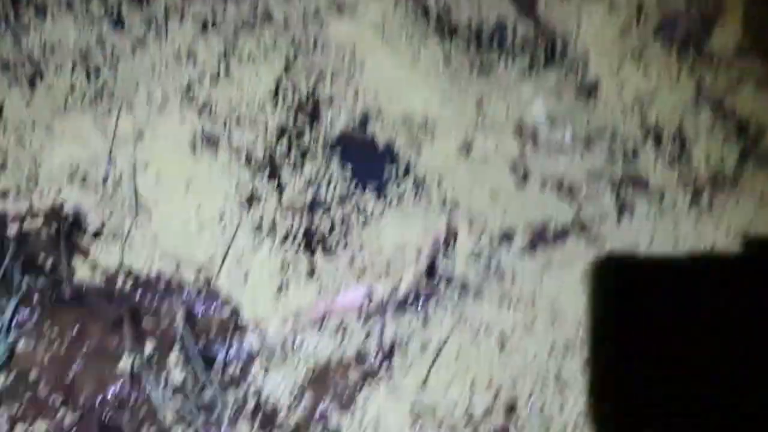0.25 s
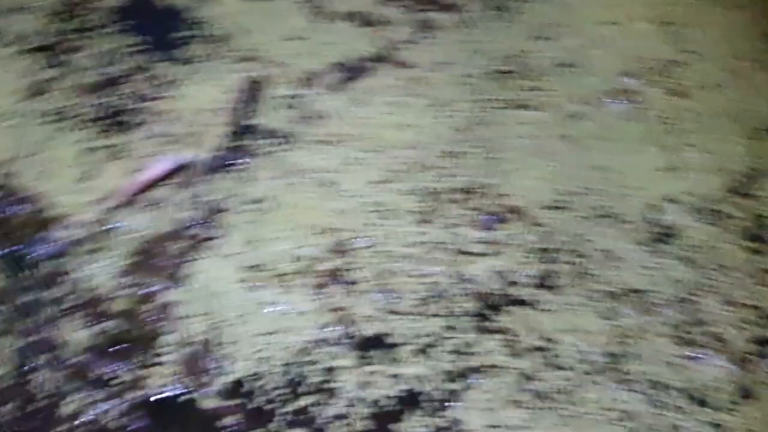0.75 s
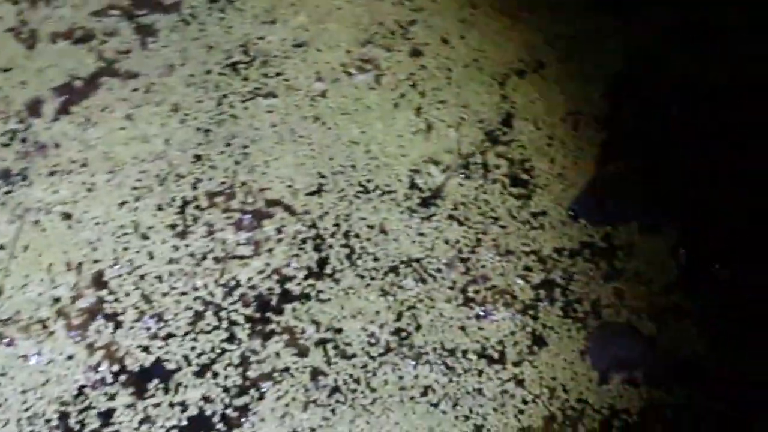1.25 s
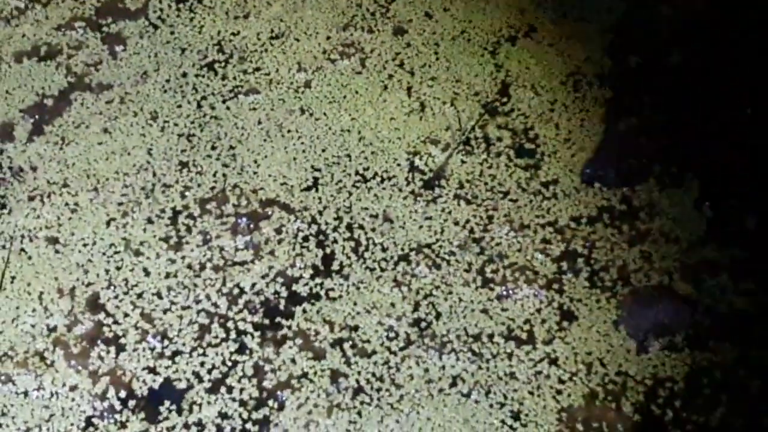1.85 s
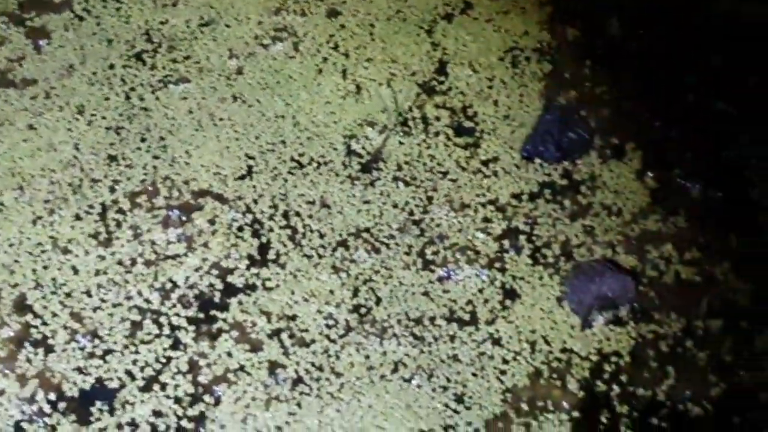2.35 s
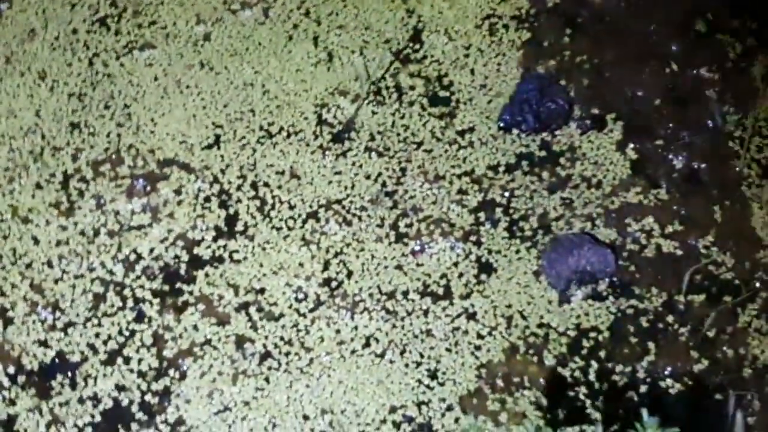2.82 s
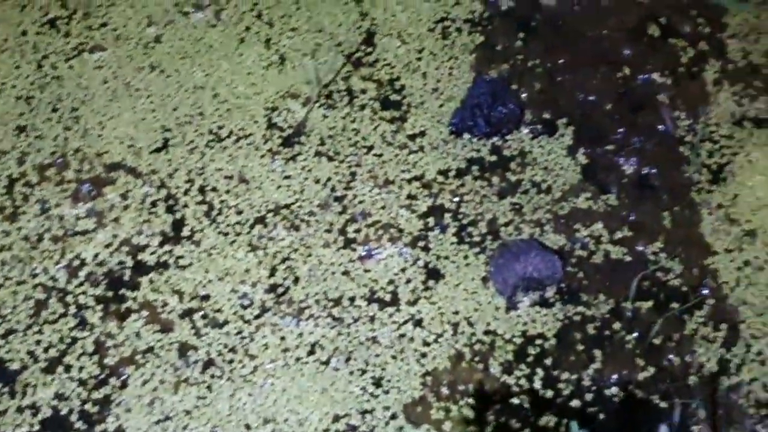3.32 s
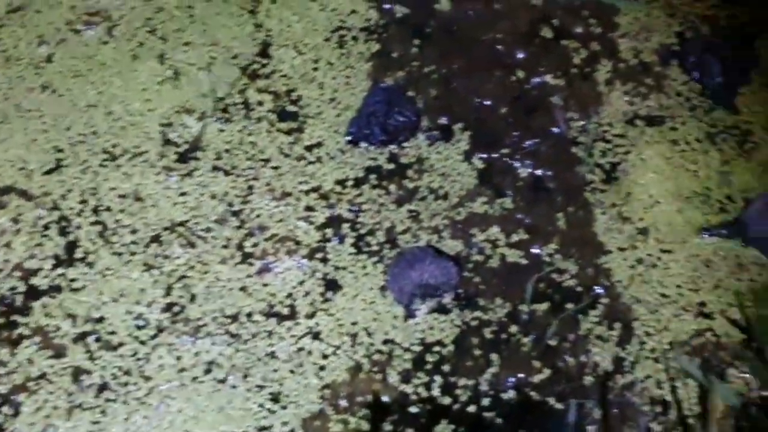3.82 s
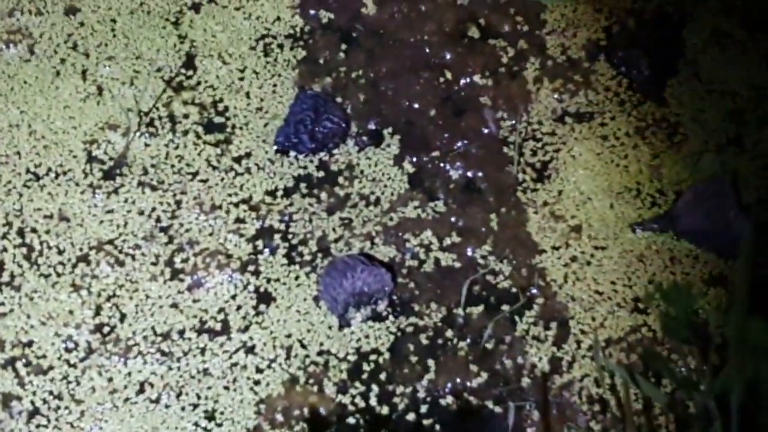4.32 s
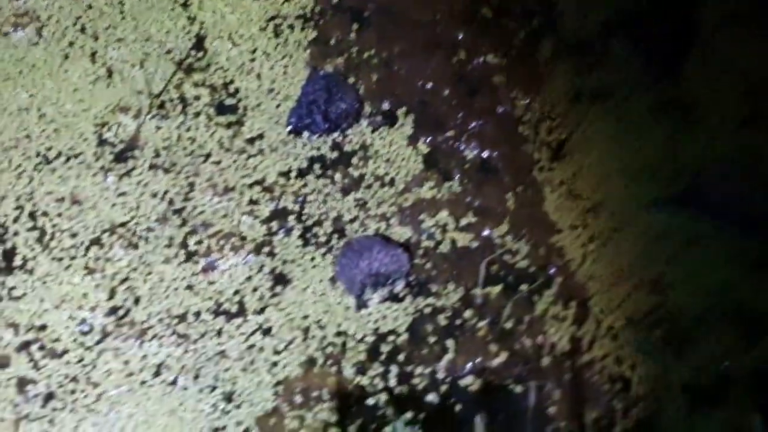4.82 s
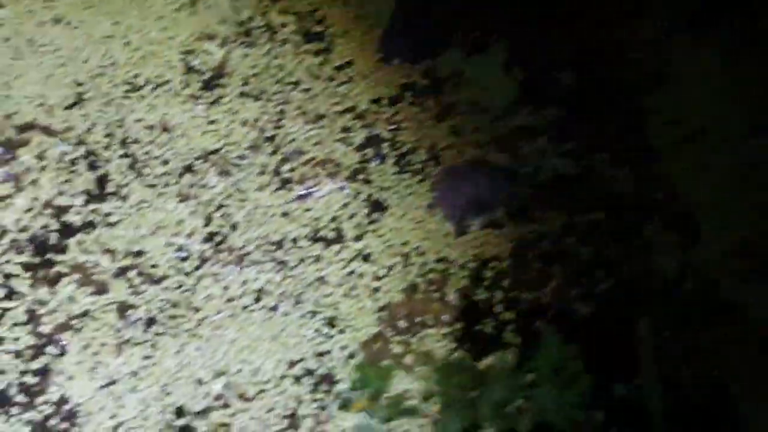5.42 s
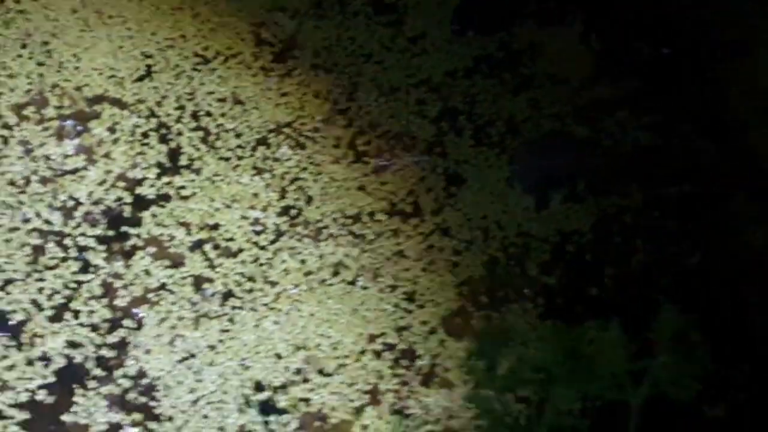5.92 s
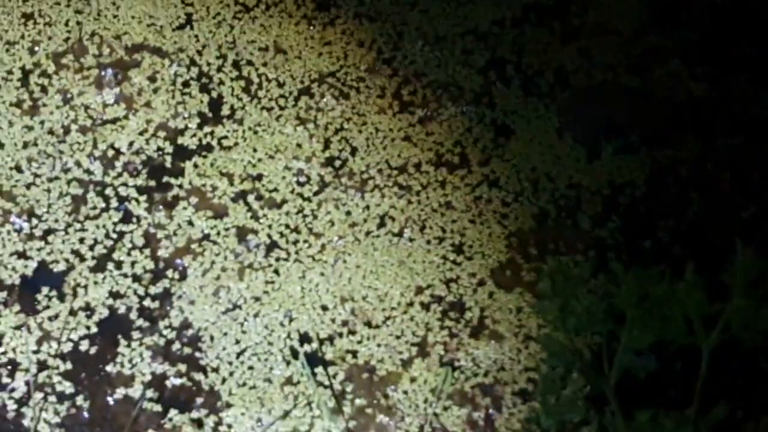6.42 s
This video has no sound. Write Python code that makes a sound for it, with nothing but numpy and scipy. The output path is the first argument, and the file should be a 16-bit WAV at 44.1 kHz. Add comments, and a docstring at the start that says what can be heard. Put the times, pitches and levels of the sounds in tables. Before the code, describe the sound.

A night pond full of tree frogs, heard through slowly turning hand-held stereo microphones. From 0 s a bright, thin rustle on the left drops away within about half a second, leaving a faint trail until 1.6 s, with tiny dry snaps near 0.1, 0.8 and 1.1 s. A close frog, slightly left, croaks at 0.1, 0.4 and 0.7 s: bursts under a tenth of a second, each a quickening ratchet of about fourteen pulses, ringing around 2.6 kHz and rising in pitch. It rests, croaks at 2.4 s, then resumes from 3.2 s, every 0.3 to 0.5 seconds, until 6.4 s. Throughout, quieter neighbours on the left croak about three times a second each, interlocking and overlapping, above a blurred, throbbing far chorus. Short dull echoes soften the calls. A very faint low engine hum and still night air remain underneath.

```python
"""Frogs at a weedy pond by night

One tree frog croaks close by, on the left, over a far chorus and neighbours on the left: two croak in a fairly
steady beat, the other croaks are irregular and sometimes overlap. Each croak is a quickening train of throat
pulses ringing the vocal sac, rising in pitch as the sac fills. A far engine hums below; a rustle of bright noise
dies away at the start and a few dry stems snap.
Hand-held microphones turn slowly, which shifts the near frog's level, colour, lag and balance."""
import sys
import numpy as np
from scipy import signal
from scipy.fft import rfft, irfft
from scipy.io import wavfile
from scipy.ndimage import uniform_filter1d

SR = 44100
rng = np.random.default_rng(int(sys.argv[2]) if len(sys.argv) > 2 else 0)


def how_loud(loudness_db):
    """Turn decibels into a plain amplitude multiplier (0 dB gives 1, 20 dB gives 10)."""
    steps = np.asarray(loudness_db, float) / 20
    return 10 ** steps


def waveform_to_disk(signal):
    """Save audio, clipped to [-1, 1], as 16-bit WAV at the path in sys.argv[1]."""
    frames = np.transpose(np.atleast_2d(signal))
    scaled = np.clip(frames, -1, 1) * 32767
    samples = np.round(scaled).astype(np.int16)
    wavfile.write(sys.argv[1], SR, samples)


N = 293706

# Still air and far traffic. Each row: frequency in Hz, relative density in dB per Hz.
NIGHT_COLOUR = [(25, -51), (45, -14.5), (62, -0.5), (85, -6), (130, -13.5), (250, -22.5), (380, -26),
                (520, -22), (800, -36.5), (3000, -37), (6000, -46.5), (10000, -41), (16000, -75.5)]
# Left-right likeness of noise. Each row: frequency in Hz, correlation from 0 to 1.
LIKENESS = [(60, 0.93), (130, 0.98), (290, 0.5), (640, .1), (16000, .02)]
# Engine tones. Each row: frequency in Hz, width in Hz, level in dB.
HUM_TONES = [(76, 7, -58.5), (286, 5, -81)]
# Rustle spectrum. Each row: frequency in Hz, relative density in dB per Hz.
RUSTLE_COLOUR = [(1500, -4), (4000, 4.5), (7000, -9.5), (11000, -5.5), (16000, -8)]
# Far chorus loudness. Each row: time in seconds, level in dB.
FAR_LEVEL = [(0.0, -29), (0.37, -29), (1.0, -34.5), (2.41, -31), (2.49, -33), (3.49, -31), (3.58, -33.5),
             (4.4, -33), (4.49, -34), (5.36, -32.5), (6.21, -35), (6.66, -29.5)]
# Neighbours. Each row: pitch in Hz, left over right in dB, left lag in us, low ring gain in dB,
# croak length in ms, croaks as (start in seconds, level in dB).
NEIGHBOURS = [(2366, 6.4, -420, -7, 84, [(.064, -27.5), (.374, -31), (.669, -22.5), (.974, -23.5),
              (1.312, -24), (1.63, -20), (1.924, -22), (2.202, -21), (2.495, -23), (2.838, -21.5),
              (3.19, -22), (3.498, -21), (3.776, -20.5), (4.102, -23.5), (4.386, -21.5), (4.671, -22),
              (4.964, -19.5), (5.268, -22), (5.575, -20), (5.875, -20.5), (6.174, -21.5), (6.59, -22.5)]),
              (2662, 8, -430, 0, 82, [(.235, -24.5), (.535, -22), (.843, -18.5), (1.245, -17.5),
              (1.575, -17), (1.865, -18), (2.157, -16), (2.485, -20.5), (2.708, -17), (3.002, -16.5),
              (3.32, -17.5), (3.666, -19), (3.95, -22), (4.24, -20), (4.527, -18), (4.835, -22),
              (5.13, -25), (5.44, -18), (5.728, -19), (6.03, -23.5), (6.327, -19), (6.6, -20.5)]),
              (2663, 6.8, -100, -5, 82, [(.315, -31), (.61, -24.5), (1.005, -19), (1.14, -20), (1.49, -19),
              (1.794, -23), (2.06, -19), (2.32, -23.5), (2.645, -23.5), (2.792, -18), (3.09, -25),
              (3.4, -28), (3.829, -21), (4.123, -20), (4.58, -37), (4.952, -24.5), (5.275, -34),
              (5.36, -27), (5.5, -39), (5.83, -25), (5.89, -20), (6.175, -21.5), (6.53, -27)])]
# Near croaks. Each row: start in seconds, length in ms, number of pulses, rasp gain in dB,
# climb of the treble rings as a share of their pitch.
NEAR_CROAKS = [(.1223, 90.7, 14, 1, .05), (.4111, 94.6, 14, 3, .05), (.7069, 90.1, 14, -5, .05),
               (2.385, 85.5, 16, 5, .38), (3.2305, 79.9, 14, -3, .36), (3.5463, 82.6, 14, 0, .2),
               (3.9401, 86.5, 14, 2, .1), (4.3511, 86.2, 14, -2, .1), (4.7325, 87.1, 14, -1, .1),
               (5.1305, 87.4, 14, 3, .1), (5.5831, 88.3, 14, -2, .03), (5.9693, 89.5, 14, -4, .03),
               (6.4421, 88.3, 14, -3, .05)]
# Microphone aim at the near frog. Each row: time in seconds, level in dB, left lag in us,
# left over right of the main ring in dB, treble gain in dB, low ring gain in dB.
AIM = [(.2, -9, 63, 2, -2.5, -2.5), (.75, -9, 33.5, 3.5, 4.5, -2), (2.399, -10, -37.5, 6, 5, 2),
       (3.25, -9, -37, 6, 6, 0.5), (3.95, -9, -97.5, 2, 2, .5), (4.75, -8.5, -105, 3.5, 2, 0),
       (5.151, -8.5, -65, 4.5, 1, -0.5), (5.6, -9, -11, 5.5, 2.5, 1), (6.45, -7.5, 27, 3, 4, 0)]
# Near sac and throat modes. Each row: frequency in Hz, level in dB, half the gain over a croak in dB.
NEAR_MODES = [(724, -47, 7), (1186, -10, -1.3), (1517, -12, 4.5), (2070, -13, -2), (2581, -4, -1.2),
              (2887, -12, 4.5), (3454, -22, -0.5), (4028, -21.5, 4), (4880, -31.5, -5.5),
              (6700, -47.5, -13.5), (8630, -37, -3), (9320, -35, 1), (11100, -48.5, 1),
              (14000, -68.5, 13.5)]
# Their pulse shapes. Each row: rise in dB per ms, fall in dB per ms, knee in ms before the slap,
# roughness in Hz (sign ignored).
NEAR_SHAPES = [(1, 3.5, .5, -0.5), (7, 5, 0.17, 0), (10, 13, 0.53, -1.5), (9.5, 9, .8, 1),
               (17.5, 3, 0.2, 2), (11.5, 7.5, 0, 1), (6, 11, 0, 21), (12.5, 15, 0.066, 23.5),
               (15.5, 12, 0, 700), (16.5, 5, 0.13, 800.5), (20, 8, 0.12, 504.5), (18.5, 7.5, .2, 301),
               (11.5, 10, .2, 395), (12.5, 10.5, .2, 1000)]
# Modes of the smaller frogs, scaled by pitch over MODE_PITCH_HZ. Each row: frequency in Hz, level in dB,
# half the gain over a croak in dB.
CHORUS_MODES = [(757, -46, 9.5), (1121.6, -16.5, -4.5), (1385, -14.5, -8), (1732, -15, -2.1),
                (2313, -14, 1.5), (2641, -4.5, -3), (3055, -13.5, -5), (3864, -24.5, -6),
                (5200, -54.5, -2.3), (7110, -41, -2.8), (8850, -53, -1.5)]
# Their pulse shapes. Each row: rise in dB per ms, fall in dB per ms, knee in ms before the slap, roughness in Hz.
CHORUS_SHAPES = [(4, 2.3, .5, 0), (7, 3, 0.66, 4.5), (7, 4.6, 0.13, 6), (8, 16, 0.32, 32.5),
                 (8, 6, 0.42, 7), (9, 3.62, 0.11, 7.5), (9, 7, 0.23, 62), (10, 5.6, 0, 202.5),
                 (16, 11, 0, 1002.5), (16, 4.9, 0, 1204), (16, 2.9, 0.13, 1000.5)]
# Snaps of dry stems. Each row: start in seconds, noise level at the start in dB, before filter and panning.
SNAPS = [(0.125, -40.5), (0.8355, -52), (1.098, -55)]

NIGHT_DB = -57
# The rustle starts loud, drops quickly, then trails off until it stops; levels before panning.
RUSTLE_DB, RUSTLE_HOLD_S, RUSTLE_FALL_DB_PER_S = -46.5, 0.15, 108
TRAIL_DB, TRAIL_FALL_DB_PER_S, TRAIL_END_S = -57, 9, 1.6

MODE_PITCH_HZ = 2600  # pitch at which the mode tables hold
SLAP_DELAY_MS, PHASE_ORIGIN_MS = 1.0, 1.376  # first slap after the start; ring phase origin before each slap
# Gaps between pulses shrink evenly; the first is longer (shares of the second gap).
FIRST_GAP, LAST_GAP = 1.23, .71
# Pulses start weak and gain over a few beats; the last ones drop.
START_DB, GAIN_PULSES, END_DB, DROP_PULSES = -9, 2.7, -5.5, 2.32
GLIDE = .09  # pitch rise over a croak, share
SAC_FOOT_HZ = 620  # lowest radiated pitch
LOW_TOP_HZ, TREBLE_FOOT_HZ, RASP_TOP_HZ, CLIMB_TOP_HZ = 1800, 4600, 7400, 10000

# The housing shades the microphones: low ring and treble take a share of the lag and their own balance.
NEAR_LOW_LAG, NEAR_TREBLE_LAG, TREBLE_LAG_US = .7, .8, 5
CHORUS_LOW_LAG, CHORUS_LOW_PAN_DB, CHORUS_TREBLE_PAN_DB = 0.76, -1.5, 5.5
FAR_LAG_US, FAR_LAG_SPREAD_US = -400, 150  # well to the left

NEAR_ECHO_DB, CHORUS_ECHO_DB = -18, -11
BANK_T60_S, BANK_CUT_HZ = .45, 7000
SLAP_BACK_MS, SLAP_BACK_DB, SLAP_BACK_CUT_HZ = 7, -13.5, 2970
TOP_CUT_HZ = 15750


def rms_one(x):
    """Scaled to unit power."""
    return x / np.sqrt(np.mean(x ** 2) + 1e-20)


def in_time(rows):
    """A curve at every sample."""
    return np.interp(np.arange(N) / SR, *np.transpose(rows))


def at_hz(points, hz):
    """A spectrum read on a log frequency axis."""
    point_hz, value = np.transpose(points)
    return np.interp(np.log(hz), np.log(point_hz), value)


def filtered(x, order, cut_hz, kind="low"):
    """Butterworth filter."""
    return signal.sosfilt(signal.butter(order, cut_hz, kind, fs=SR, output="sos"), x)


def coloured_noise(spectrum):
    """Stereo noise of the given colour, alike in the bass; rms 1."""
    hz = np.maximum(np.fft.rfftfreq(N, 1 / SR), 1)
    mid, side = rfft(rng.standard_normal((2, N)))
    alike = np.clip(at_hz(LIKENESS, hz), -1, 1)
    pair = np.sqrt(1 + alike) * mid + np.sqrt(1 - alike) * side * np.array([[1], [-1]])
    return rms_one(irfft(pair * how_loud(at_hz(spectrum, hz)), N))


def night_floor():
    """Still air and far traffic: steady coloured noise."""
    return how_loud(NIGHT_DB) * coloured_noise(NIGHT_COLOUR)


def hum():
    """A far engine: noise through narrow resonances gives wavering tones, alike on both sides."""
    out = np.zeros(N)
    for hz, width_hz, level_db in HUM_TONES:
        r = np.exp(-np.pi * width_hz / SR)
        poles = [1, -2 * r * np.cos(2 * np.pi * hz / SR), r * r]
        tone = signal.lfilter([1, 0, -1], poles, rng.standard_normal(N + SR))
        out += how_loud(level_db) * rms_one(tone[SR:])  # the resonance has settled by then
    return out


def rustle():
    """Bright noise, mostly on the left, in a fast burst and a slower trail."""
    t = np.arange(N) / SR
    burst = how_loud(RUSTLE_DB - RUSTLE_FALL_DB_PER_S * np.maximum(t - RUSTLE_HOLD_S, 0))
    trail = how_loud(TRAIL_DB - TRAIL_FALL_DB_PER_S * t) * np.clip((TRAIL_END_S - t) / .05, 0, 1)
    return np.hypot(burst, trail) * how_loud([[4.], [-9.]]) * coloured_noise(RUSTLE_COLOUR)


def add_croak(out, modes, shapes, start_s, length_ms, pitch_hz, level_db, pan_db, lag_s,
              jitter_ms, uneven_db, climb=0, count=14):
    """In every pulse the sac modes swell to the slap of the folds, then ring out."""
    hz, mode_db, half_gain_db = np.transpose(modes)
    rise, fall, knee_ms, rough_hz = np.transpose(shapes)[..., None]
    n_modes, k = len(hz), np.arange(count)

    gaps = np.r_[0, FIRST_GAP, np.linspace(1, LAST_GAP, count - 2)]
    way = np.cumsum(gaps) / np.sum(gaps)
    to_go = 1 - way[:, None]
    fill = (way ** .7 - .6)[:, None]  # the sac tightens, fastest at first
    jitter = jitter_ms * rng.standard_normal(count)
    slaps = start_s + (SLAP_DELAY_MS + way * length_ms + jitter) / 1000

    freq = hz * pitch_hz / MODE_PITCH_HZ * (1 + GLIDE * fill)
    freq = freq * (1 - climb * (.25 + to_go ** 3))
    freq = freq * (1 + .003 * rng.standard_normal((count, n_modes)))

    pulse_db = START_DB * np.exp(-k / GAIN_PULSES) + END_DB * np.exp(-k[::-1] / DROP_PULSES)
    level = level_db + pulse_db[:, None] + mode_db + 2 * half_gain_db * fill
    level = level + uneven_db * rng.standard_normal((count, n_modes))

    # axes: pulse, mode, sample
    first, span = np.round(slaps * SR).astype(int) - 200, 700
    t = ((first[:, None] + np.arange(span)) / SR - slaps[:, None])[:, None]
    ms = 1000 * t + knee_ms
    swell = signal.windows.tukey(span, .2) * 2 / (how_loud(-rise * ms) + how_loud(fall * ms))

    # wet tissue: the phase of the upper modes wanders, which smears them toward noise
    steps = uniform_filter1d(rng.standard_normal(swell.shape), size=6, axis=2)
    wander = np.cumsum(steps, axis=2) * np.sqrt(2 * np.pi * np.abs(rough_hz) / SR)
    wander -= wander[..., 150:151].copy()  # no wander just ahead of the slap
    phase = wander + np.pi * np.arange(n_modes)[:, None]  # adjacent modes in opposite phase

    for side, sign in enumerate((.5, -.5)):
        heard_s = t + PHASE_ORIGIN_MS / 1000 - sign * lag_s
        rings = np.sin(2 * np.pi * freq[..., None] * heard_s + phase)
        wave = np.sum(how_loud(level + sign * pan_db)[..., None] * swell * rings, axis=1)
        for at, pulse in zip(first, wave):
            if 0 <= at < N:
                out[side, at:at + span] += pulse[:N - at]


def add_chorus_croak(out, start_s, length_ms, pitch_hz, level_db, low_db, pan_db, lag_us, jitter_ms, uneven_db):
    """One croak of a smaller frog, placed to the side by lag and balance."""
    hz = np.array(CHORUS_MODES)[:, 0]
    low, high = hz < LOW_TOP_HZ, hz > TREBLE_FOOT_HZ
    pans = pan_db + CHORUS_LOW_PAN_DB * low + CHORUS_TREBLE_PAN_DB * high
    lags_s = lag_us * np.where(low, CHORUS_LOW_LAG, 1)[:, None] / 1e6
    add_croak(out, CHORUS_MODES, CHORUS_SHAPES, start_s, length_ms, pitch_hz, level_db + low_db * low,
              pans, lags_s, jitter_ms, uneven_db)


def far_chorus(count=110):
    """Many frogs at evenly spread random moments blur into a throbbing band."""
    out = np.zeros((2, N))
    slot_s = N / SR / (count - 1)
    for k, (when, far, long, small, left) in enumerate(rng.random((count, 5))):
        lag_us = FAR_LAG_US + FAR_LAG_SPREAD_US * (.5 - left)
        add_chorus_croak(out, (k + when - 1) * slot_s, 75 + 18 * long, 2380 + 420 * small, -4 * far, 0,
                         2.1 + 6 * left, lag_us, jitter_ms=.2, uneven_db=1.3)
    return how_loud(in_time(FAR_LEVEL)) * rms_one(out)


def bank_echoes(x):
    """Reeds, banks and water scatter the calls: a short dull tail of noise, another on each side."""
    t = np.arange(SR // 2) / SR
    tail = rng.standard_normal((2, len(t))) * how_loud(-60 * t / BANK_T60_S) * (t > .004)
    tail = filtered(tail, 2, BANK_CUT_HZ)
    tail = tail / np.sqrt(np.sum(tail ** 2, axis=1, keepdims=True))
    return signal.fftconvolve(x, tail, axes=1)[:, :N]


def neighbours():
    """Further off and less even; each has its own low ring and lag, all on the left; two share a pitch."""
    out = np.zeros((2, N))
    for pitch_hz, pan_db, lag_us, low_db, length_ms, croaks in NEIGHBOURS:
        for start_s, level_db in croaks:
            add_chorus_croak(out, start_s, length_ms, pitch_hz, level_db, low_db, pan_db, lag_us,
                             jitter_ms=.1, uneven_db=1.5)
    return out


def near_frog():
    """As the microphones turn, the left one leads and gets more of the treble and low ring."""
    out, hz = np.zeros((2, N)), np.array(NEAR_MODES)[:, 0]
    low, high = hz < LOW_TOP_HZ, hz > TREBLE_FOOT_HZ
    rasp, climbing = high * (hz < RASP_TOP_HZ), high * (hz < CLIMB_TOP_HZ)
    aim_s, *aim = np.transpose(AIM)
    for start_s, length_ms, pulses, rasp_db, climb in NEAR_CROAKS:
        level_db, lag_us, pan_db, treble_db, low_db = [np.interp(start_s, aim_s, column) for column in aim]
        main_pan = pan_db + 3. * (hz > 3300)
        pans = np.select([low, high], [3.2 - .014 * lag_us, 3.6 - .045 * lag_us], main_pan)
        treble_lag_us = NEAR_TREBLE_LAG * lag_us + TREBLE_LAG_US
        lags_us = np.select([low, high], [NEAR_LOW_LAG * lag_us, treble_lag_us], lag_us)
        colour_db = level_db + treble_db * high + low_db * low + rasp_db * rasp
        add_croak(out, NEAR_MODES, NEAR_SHAPES, start_s, length_ms, MODE_PITCH_HZ, colour_db, pans,
                  lags_us[:, None] / 1e6, jitter_ms=.1, uneven_db=1, climb=climb * climbing, count=pulses)
    return out


def stem_snaps():
    """Each snap is a bright noise burst of a few milliseconds, on the left."""
    out, t = np.zeros(N), np.arange(SR // 50) / SR
    for start_s, level_db in SNAPS:
        burst = how_loud(level_db - 60 * t / 0.027) * rng.standard_normal(len(t))
        out[round(start_s * SR):][:len(t)] += burst
    return filtered(out, 2, 7000, "high") * how_loud([[4.], [-6.]])


def slap_back(x):
    """One dull echo from the bank behind the near frog lengthens each croak."""
    late = np.pad(x, ((0, 0), (round(SLAP_BACK_MS * SR / 1000), 0)))[:, :N]
    return how_loud(SLAP_BACK_DB) * filtered(late, 2, SLAP_BACK_CUT_HZ)


def scene():
    """Frogs near and far with their echoes, over the night floor."""
    near, chorus = near_frog(), neighbours() + far_chorus()
    echoes = bank_echoes(how_loud(NEAR_ECHO_DB) * near + how_loud(CHORUS_ECHO_DB) * chorus)
    frogs = near + slap_back(near) + chorus + echoes
    frogs = filtered(frogs, 4, SAC_FOOT_HZ, "high")  # small sacs radiate no bass
    return frogs + rustle() + stem_snaps() + night_floor() + hum()


def low_pass(x):
    """Removes everything above the highest recorded frequency."""
    return signal.sosfilt(signal.butter(12, 16370, fs=SR, output="sos"), x)


def record(dry):
    """Peaks are rounded, then the top is cut steeply."""
    top_cut = signal.ellip(12, .5, 60, TOP_CUT_HZ, fs=SR, output="sos")
    mix = signal.sosfilt(top_cut, np.tanh(dry))
    return low_pass(mix)


dry = scene()
out = record(dry)
waveform_to_disk(out)
```